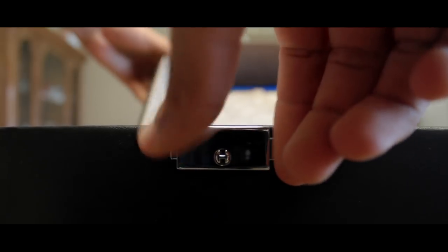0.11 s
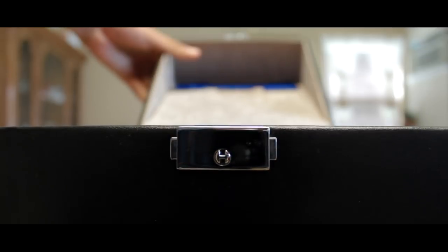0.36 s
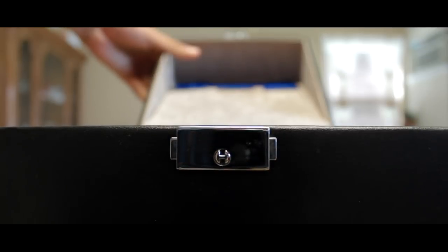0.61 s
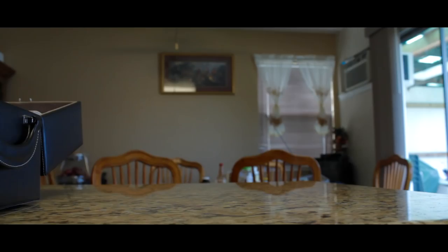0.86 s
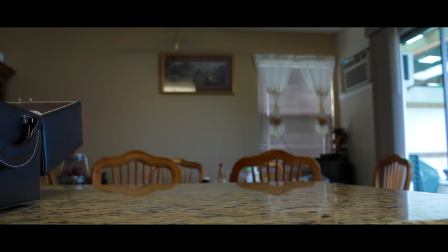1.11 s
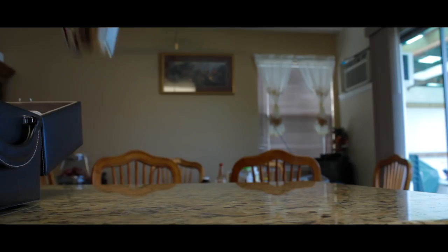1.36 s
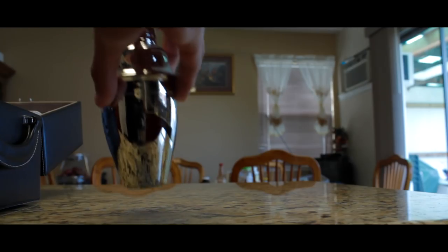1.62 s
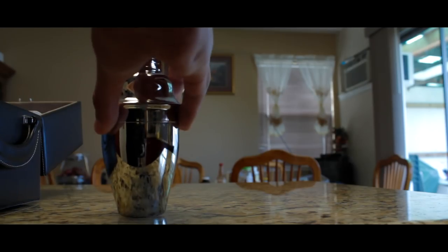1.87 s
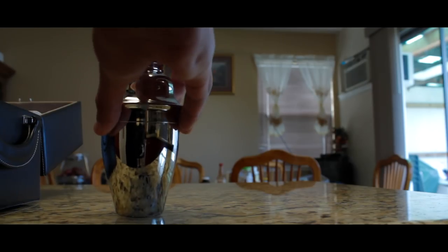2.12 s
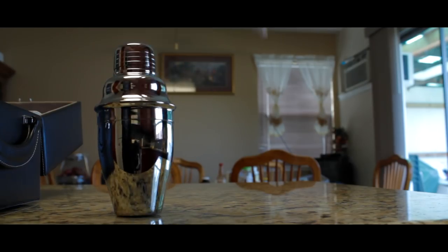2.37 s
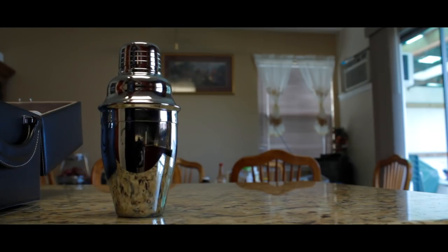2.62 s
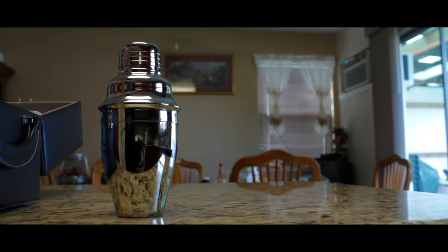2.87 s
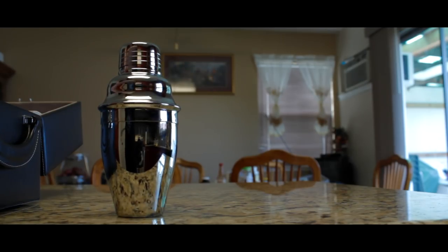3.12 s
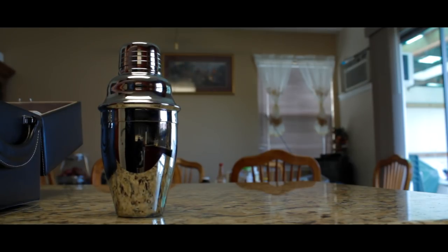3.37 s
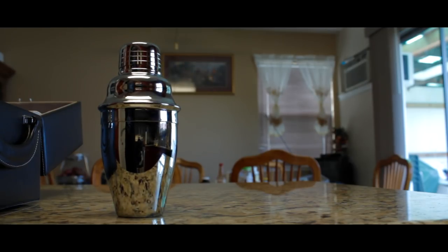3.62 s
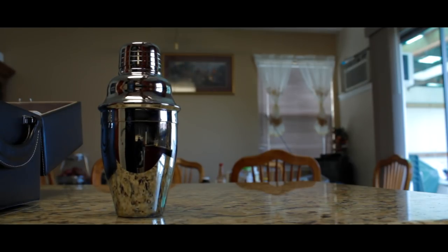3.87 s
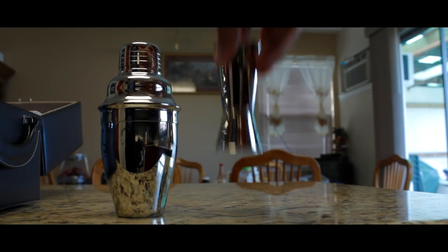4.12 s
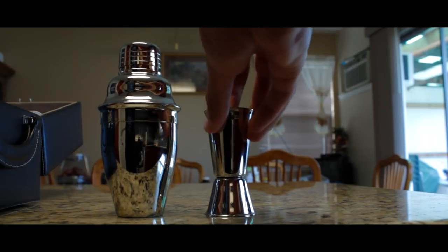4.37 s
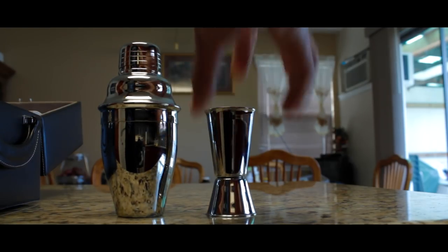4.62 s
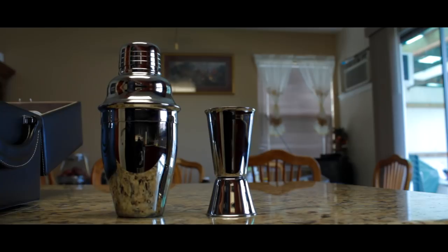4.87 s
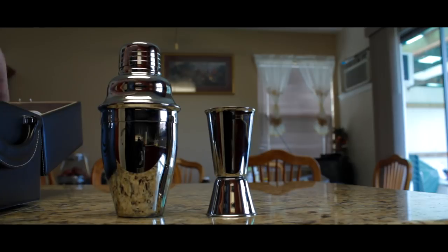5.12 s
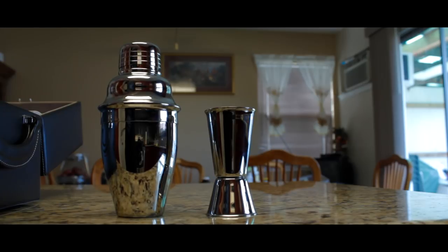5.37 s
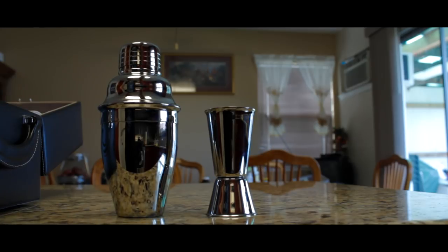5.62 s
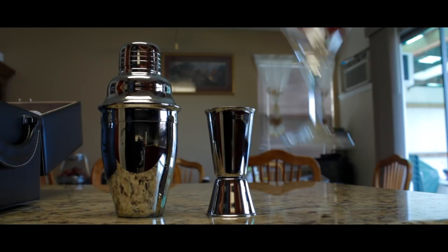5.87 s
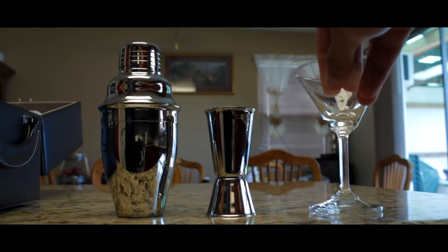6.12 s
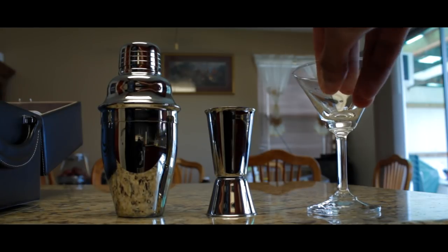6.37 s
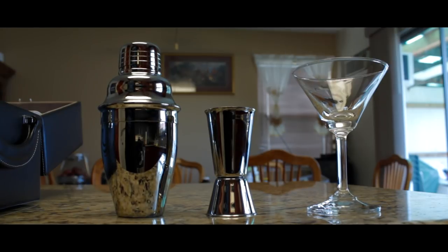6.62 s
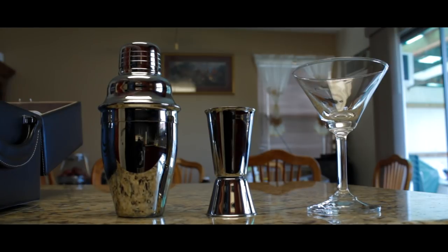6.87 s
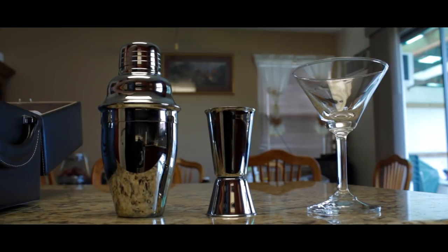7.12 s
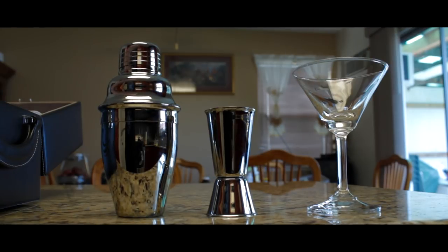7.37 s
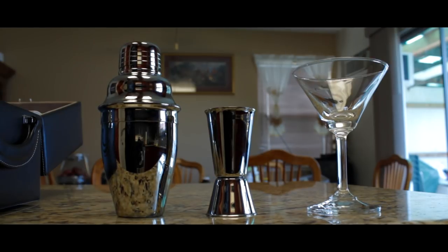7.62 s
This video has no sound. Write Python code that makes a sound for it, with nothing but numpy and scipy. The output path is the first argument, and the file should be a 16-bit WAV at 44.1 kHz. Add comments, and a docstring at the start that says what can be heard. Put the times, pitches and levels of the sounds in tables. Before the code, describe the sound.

A quiet kitchen with soft, wide appliance rumble and faint microphone hiss throughout; the hiss drops slightly near 0.9 s and the rumble swells gently around 2.8 s. Between 0.14 and 0.27 s a case latch gives several small, dry clicks. At 1.96 s a metal shaker hits the stone counter with a loud, hard clack and a very fast cap rattle. Its tin taps at 2.43 s, with fainter touches until 2.76 s. Tiny spoon ticks from 3.17 s lead to a sharp jigger-and-tool clatter at 3.39 s, then a loud case lid knock at left around 3.47-3.52 s. At 4.47 s the jigger lands with a bright, rapid chatter. A small dry spoon knock comes at 5.28 s. At 6.20 s a stemmed glass clinks down crisply, followed by faint glass and spoon touches until 6.55 s. Impacts are close, centred, short-ringing and slightly clipped, with brief room echoes; room tone remains.

```python
"""In a kitchen a case latch clicks; then a metal shaker with a rattling cap and its tin land on a stone counter.
A spoon, a jigger and loose tools follow, the case lid knocks at the left, and the jigger chatters on its rim.
A spoon drops with a drier knock; last a stemmed glass is set down and the spoon touches again.
Each blow sums hand-damped modes and a contact crack, and noise echoes answer; a close centre microphone clips.
Throughout, a wider pair hears the room tone: appliance rumble and microphone hiss, made of coloured noise."""
import sys
import numpy as np
from scipy import signal
from scipy.fft import rfft, irfft
from scipy.io import wavfile
from scipy.ndimage import uniform_filter1d

SR = 44100
rng = np.random.default_rng(int(sys.argv[2]) if len(sys.argv) > 2 else 0)


def amplitude_ratio(level_db):
    """Convert a level in decibels to the matching linear amplitude (field) ratio."""
    exponent = np.asarray(level_db, float) / 20
    return 10 ** exponent


def generate_wav(sig):
    """Save sig (samples, or channels by samples) to the path in sys.argv[1] as 16-bit PCM at SR."""
    pcm = np.round(np.clip(np.atleast_2d(sig).T, -1, 1) * 32767).astype(np.int16)
    wavfile.write(sys.argv[1], SR, pcm)


N = 341334

# damped modes of each object: mode_hz, relative_level_db, t60_s
SHAKER_MODES = [(166.6, -22, 0.35), (376, -16, 0.056), (520, -13, 0.017), (754, -3, 0.032),
                (980, -9.5, 0.019), (1430, -4, 0.033), (1606, -1, 0.014), (1930, -5, 0.0094),
                (2260, -5, 0.024), (2550, -22, 0.052), (3784, -6, 0.086), (3970, -18, 0.061),
                (5160, -21, 0.09), (5570, -20, 0.027), (6560, -39, .02), (7670, -14.5, 0.057),
                (8370, -13.5, 0.017), (10500, -37, 0.02), (10900, -30, 0.027), (13000, -15, 0.057),
                (12700, -13, 0.021), (14100, -31.5, .05), (14000, -30, .02), (15170, -28, 0.031)]
TIN_MODES = [(300, -14, 0.067), (540, -1, 0.046), (700, -2, 0.078), (834, -0.5, 0.048), (980, 0, 0.02),
             (1404, 4, 0.036), (1560, 7, 0.022), (1880, 3.5, 0.027), (2273, 1.5, 0.051), (2650, -9.5, 0.01),
             (3900, -3.5, 0.081), (5000, -23, 0.12), (6000, -17, 0.024), (7340, -16.5, 0.017),
             (8300, -21, 0.024), (10200, -40, .02), (11880, -21, 0.038), (13200, -27, .02)]
JIGGER_MODES = [(4663, -1, 0.057), (6100, -11.5, 0.026), (6370, -5, 0.025), (7260, -11, 0.016),
                (8780, -7.5, 0.049), (9640, -28, 0.077), (11200, -17, 0.092), (12300, -24, 0.078),
                (13845, -25, 0.12), (15080, -9, 0.066), (15200, -27, 0.081)]
JIGGER_FOOT_MODES = [(357, -14.5, 0.036), (492, -10, 0.077), (690, -4, 0.013), (900, -5, 0.047),
                     (1150, -2, 0.011), (1414, 2.5, 0.066), (1530, 1, 0.028), (1805, 5, 0.016),
                     (2200, -1, 0.045), (2780, 0, 0.01), (3400, 2.5, 0.0081), (4100, -2.5, 0.013)]
TOOL_MODES = [(895, -3, 0.096), (1390, 4, 0.017), (1730, 6, 0.024), (2140, -8, 0.051), (2580, -3, 0.017),
              (3000, -6.5, 0.12), (3355, 2.5, .025), (3800, -12, 0.49), (4370, -5, 0.062),
              (5500, -18, 0.081), (7100, -6.5, 0.18)]
SPOON_MODES = [(1620, -2, 0.027), (3034, -4, 0.055), (3758, 0.5, 0.062), (4500, -4, 0.021),
               (5570, -3, 0.022), (7440, -9, 0.043), (9500, -6.5, .03), (12200, -10, .02),
               (15000, -24, .01)]
GLASS_MODES = [(277, -14, 0.05), (372, -15, 0.21), (570, -14, 0.0277), (793, -5, 0.046), (1260, -12, 0.011),
               (1453, 1.5, 0.034), (1690, 9, 0.013), (2200, -19, 0.036), (2940, -7.5, 0.031),
               (3700, -11, 0.009), (4230, 8.5, 0.01), (4900, 2, 0.0078), (5570, -8.5, 0.034),
               (6060, -16, 0.024), (7360, -2, 0.042), (8600, -45, .02), (10770, -7, .02),
               (11320, -8.5, 0.077), (13200, -31, .04), (12840, -25, .02), (13900, 0.5, 0.043),
               (16000, -43, .01)]
LATCH_MODES = [(700, -4.5, 0.0074), (1170, -6, 0.016), (2200, -0.5, 0.0077), (3300, 0, 0.0057),
               (5900, 16, 0.0029), (13800, -50, 0.0073)]
LID_MODES = [(318, -12, 0.021), (523, -9, 0.027), (653.6, -8.5, 0.11), (1114, -0.5, 0.011),
             (1640, -1.5, 0.0086), (2030, -7, 0.03), (2260, -6.5, 0.0085), (2970, 1.5, 0.016),
             (3690, 3, 0.0094), (5570, -1, 0.0044), (6440, -4.5, 0.011), (8100, 0.5, 0.0023),
             (9730, -11, 0.013), (12900, -18.5, 0.013), (15000, -19, .004)]

# blows on each object: start_s, level_db, favoured_hz, fall_off_db_per_octave, room_share_db
SHAKER_BLOWS = [(1.956, -12.5, 2000, 3, -6)]
TIN_BLOWS = [(2.425, -29.5, 2000, 0.3, -6), (2.43, -32, 1000, 10, -10), (2.582, -45, 2260, 0.5, 0.5),
             (2.6845, -36.5, 890, 7, -4), (2.757, -48, 810, 18, -6)]
JIGGER_BLOWS = [(3.32, -64, 4680, 4, 8), (3.346, -60.5, 8780, 8.5, 15), (3.388, -28, 8000, 1.6, -0.8)]
TOOL_BLOWS = [(3.3883, -24.5, 2000, 2.6, -7.5), (3.415, -39, 1850, 11, -2), (3.424, -33, 2500, 17, 5)]
SPOON_BLOWS = [(3.167, -53, 4600, 13, -10), (3.184, -47, 2390, 9, 0), (3.227, -62, 3400, 16, -7),
               (3.245, -53.5, 4740, 11, 0), (3.252, -49.5, 2200, 10, 3.5), (6.471, -57.5, 5570, 40, 6.5),
               (6.518, -52.5, 4300, 13.5, 6)]
SPOON_DROP_BLOWS = [(5.2813, -46.5, 3200, 2.7, -4), (5.286, -50.5, 3600, 2.6, -8)]
GLASS_BLOWS = [(6.2001, -25.5, 2000, 1.13, -8.5), (6.209, -28.5, 3400, 11, -29), (6.271, -38, 2780, 9.2, 4),
               (6.542, -61, 6000, 0.3, -20), (6.548, -43.5, 1440, 6.9, -3)]
LATCH_BLOWS = [(.139, -35, 900, 13.3, -12), (.212, -37.5, 2000, 1.1, -14), (.237, -33, 800, 10.5, -9),
               (.241, -40.5, 2460, 8.9, -9), (.266, -32, 700, 12, -26)]
LID_BLOWS = [(3.4724, -20.5, 3700, 2.6, 6), (3.4775, -20, 9100, 11, -17), (3.487, -21, 616, 4.2, -9.5),
             (3.519, -29, 12500, 11, 0)]

# faint tings as fingers leave the rims: start_s, pitch_hz, level_db, t60_s
RIM_TINGS = [(2.334, 2610, -63, 0.22), (2.337, 4620, -66, 0.11), (2.337, 9000, -66, .06),
             (4.65, 13150, -64, .15), (4.655, 9900, -68, .1)]
# reverberation by octave: centre_hz, t60_s, relative_level_db
ROOM_BANDS = [(131, 0.2, -13), (264, 0.56, 10), (466, 0.35, 9), (1000, 0.5, 7), (2000, 0.44, 1),
              (3900, 0.45, -1), (8000, 0.4, -1), (15400, 0.16, 3.5)]
# width of the lid's echoes: frequency_hz, side_minus_mid_db
LID_WIDTH = [(200, -10), (1000, -8), (4400, -7), (8000, -0.5), (15000, -7)]
# spectral density of the room tone: frequency_hz, relative_level_db
TONE_COLOUR = [(8.2, -41), (14, -4.5), (95, 3.5), (124, -2), (148, 0), (230, -6), (274, -2), (337, -7),
               (557, -10.5), (626, -13.5), (704, -14), (1700, -22), (8370, -33), (14600, -34), (16000, -37)]
# width of the room tone: frequency_hz, side_minus_mid_db
TONE_WIDTH = [(60, -3.5), (110, -7.5), (200, -6), (380, -8), (700, -8), (1290, -9), (2380, -9.5),
              (4400, -7.5), (8120, -7.5), (15000, -7.5)]

# bouncing after a landing: first_contact_s, first_gap_s, gap_ratio
CAP_TIMING = 1.968, .0085, .78
JIGGER_TIMING = 4.4664, .0053, 1
# bouncing contacts: first_level_db, drop_db_per_bounce, favoured_hz, fall_off_db_per_octave, room_share_db
CAP_RATTLE = -26.5, 0, 12000, 17, -11
RIM_CHATTER = -22.5, 3.5, 5000, 2.8, -8.5
FOOT_CHATTER = -26, 3, 1500, 1.5, -6

# crack of a plain blow over its modes (dB); the objects below add their own offsets (dB)
CRACK_DB = 27.5
SHAKER_CRACK_DB, CAP_CRACK_DB, TIN_CRACK_DB, JIGGER_CRACK_DB, RIM_CRACK_DB, FOOT_CRACK_DB = 2.5, -6, -2, -5, -4.5, -17
TOOL_CRACK_DB, SPOON_CRACK_DB, DROP_CRACK_DB, GLASS_CRACK_DB, LATCH_CRACK_DB, LID_CRACK_DB = -9, -8.5, 0, 7.5, -16, -7.5
SOFT_DB = 0.8  # crack lost per dB/octave of fall-off: glancing touches crack less
SLAB_DB = 3.5  # the stone slab spreads the crack into the room more than the ringing
CLIP = .222  # amplitude at which the centre microphone's input clips

# the rumble swells once and wanders; the hiss steps down early on
RUMBLE_DB, SWELL_DB, SWELL_S, SWELL_WIDTH_S, WANDER_DB = -60.5, 2, 2.8, 2.07, 1.07
HISS_DB, EARLY_HISS_DB, HISS_STEP_S = -72, -70.5, .86


def counter():
    """Superposition and saturation: blows, tings and echoes add up at the centre microphone, whose input clips."""
    cap_blows = bounces(CAP_TIMING, CAP_RATTLE, count=4)
    rim_blows = bounces(JIGGER_TIMING, RIM_CHATTER, count=4)
    foot_blows = bounces(JIGGER_TIMING, FOOT_CHATTER, count=3)
    sets = [
        (SHAKER_MODES, SHAKER_BLOWS, SHAKER_CRACK_DB),
        (SHAKER_MODES, cap_blows, CAP_CRACK_DB),
        (TIN_MODES, TIN_BLOWS, TIN_CRACK_DB),
        (JIGGER_MODES, JIGGER_BLOWS, JIGGER_CRACK_DB),
        (JIGGER_MODES, rim_blows, RIM_CRACK_DB),
        (JIGGER_FOOT_MODES, foot_blows, FOOT_CRACK_DB),
        (TOOL_MODES, TOOL_BLOWS, TOOL_CRACK_DB),
        (SPOON_MODES, SPOON_BLOWS, SPOON_CRACK_DB),
        (SPOON_MODES, SPOON_DROP_BLOWS, DROP_CRACK_DB),
        (GLASS_MODES, GLASS_BLOWS, GLASS_CRACK_DB),
        (LATCH_MODES, LATCH_BLOWS, LATCH_CRACK_DB),
    ]
    direct, send = sum(strike(*one) for one in sets)
    return np.clip(direct + tings() + room(send, gap_s=0.0022), -CLIP, CLIP)


def strike(modes, blows, crack_db):
    """Modal excitation: each blow rings damped modes and a contact crack; returns direct sound and room feed."""
    hz, db, t60 = np.transpose(modes)
    t = np.arange(SR // 2) / SR
    decay = np.exp(-np.log(1000) * t / t60[:, None])
    # signs alternate from mode to mode, so the spectrum between neighbours stays filled and the onset soft
    sign = (-1) ** np.arange(len(hz))[:, None]
    shapes = sign * decay * np.sin(2 * np.pi * hz[:, None] * t)
    out = np.zeros((2, N + len(t)))
    for start_s, blow_db, spot_hz, fall_db, room_db in blows:
        # the spot that is hit favours some modes, and no two blows land alike
        octaves = np.abs(np.log2(hz / spot_hz))
        mode_db = db - max(fall_db, 0) * octaves + rng.standard_normal(len(hz))
        ringing = amplitude_ratio(mode_db) @ shapes
        sound = np.array([ringing, amplitude_ratio(room_db) * ringing])
        # the many fast-dying modes in between merge into a click of the same broad colour
        broad_db = uniform_filter1d(mode_db, size=3)
        low_end = (hz[0] / 2, broad_db[0] - 4)
        high_end = (hz[-1] * 2, broad_db[-1] - 13)
        crack = click([low_end, *zip(hz, broad_db), high_end])
        path_db = np.array([[0], [room_db + SLAB_DB]])
        sound[:, :len(crack)] -= amplitude_ratio(CRACK_DB + crack_db - SOFT_DB * fall_db + path_db) * crack
        i = int(start_s * SR)
        out[:, i:i + len(t)] += amplitude_ratio(blow_db) * sound
    return out[:, :N]


def click(table):
    """Minimum phase: folding the cepstrum gives a causal click with the colour of (Hz, dB) points."""
    hz, db = np.transpose(table)
    size = 1024
    f = np.arange(size // 2 + 1) * SR / size + 1
    cepstrum = irfft(np.log(amplitude_ratio(np.interp(np.log(f), np.log(hz), db))))
    cepstrum[1:size // 2] *= 2
    cepstrum[size // 2 + 1:] = 0
    return irfft(np.exp(rfft(cepstrum)))


def bounces(timing, contact, count):
    """Repeated impact: gaps keep a fixed ratio and levels fall by a fixed drop, which may be zero."""
    start_s, gap_s, ratio = timing
    db, drop_db, *spot = contact
    blows = []
    for k in range(count):
        elapsed_s = gap_s * sum(ratio ** j for j in range(k))
        blows.append((start_s + elapsed_s, db - k * drop_db, *spot))
    return blows


def tings():
    """Free vibration: single faint partials, each decaying exponentially."""
    t = np.arange(SR // 4) / SR
    out = np.zeros(N)
    for start_s, hz, db, t60 in RIM_TINGS:
        decay = np.exp(-np.log(1000) * t / t60)
        out[int(start_s * SR):][:len(t)] += amplitude_ratio(db) * decay * np.sin(2 * np.pi * hz * t)
    return out


def lid():
    """Stereo by level difference: the lid's direct sound is mostly left, its diffuse echoes partly shared."""
    direct, send = strike(LID_MODES, LID_BLOWS, LID_CRACK_DB)
    mid = room(send, gap_s=0.00047)
    side = colour(room(send, gap_s=0.0024), LID_WIDTH)
    left = amplitude_ratio(4) * direct + amplitude_ratio(-2.5) * (mid + side)
    right = amplitude_ratio(-17) * direct + amplitude_ratio(-1.85) * (mid - side)
    return np.array([left, right])


def room(x, gap_s):
    """Diffuse reverberation: noise echoes build up after a gap and die octave by octave."""
    t = np.arange(int(.8 * SR)) / SR
    f = np.maximum(np.arange(len(t) // 2 + 1) * SR / len(t), 1)
    noise = rfft(rng.standard_normal(len(t)))
    tail = 0
    for hz, t60, db in ROOM_BANDS:
        window = np.cos(np.pi / 2 * np.clip(np.log2(f / hz), -1, 1)) ** 2
        band = irfft(noise * window, len(t))
        tail = tail + amplitude_ratio(db) * band * np.exp(-np.log(1000) * t / t60)
    build_up = 1 - np.exp(-np.maximum(t - gap_s, 0) / 0.00083)
    tail = tail * build_up
    unit_tail = tail / np.sqrt(np.sum(tail ** 2))
    return signal.fftconvolve(x, unit_tail)[:N]


def room_tone():
    """Stationary noise under slow gains: swelling appliance rumble and microphone hiss, widest in the bass."""
    mid = colour(rng.standard_normal(N), TONE_COLOUR)
    side = colour(colour(rng.standard_normal(N), TONE_COLOUR), TONE_WIDTH)
    t = np.arange(N) / SR
    rumble, hiss = split(np.array([mid + side, mid - side]), 500)
    # the levels refer to these bands of the mid signal
    rumble_ref = signal.sosfilt(signal.butter(4, [30, 400], "band", fs=SR, output="sos"), mid)
    hiss_ref = signal.sosfilt(signal.butter(4, [3000, 15000], "band", fs=SR, output="sos"), mid)
    wander = np.interp(t, np.arange(32) / 4, rng.standard_normal(32))
    swell = np.exp(-((t - SWELL_S) / SWELL_WIDTH_S) ** 2)
    rumble_db = RUMBLE_DB + SWELL_DB * swell + WANDER_DB * wander
    hiss_db = np.where(t < HISS_STEP_S, EARLY_HISS_DB, HISS_DB)
    return rumble / np.std(rumble_ref) * amplitude_ratio(rumble_db) + hiss / np.std(hiss_ref) * amplitude_ratio(hiss_db)


def colour(x, table):
    """Spectral weighting: a signal is shaped by (Hz, dB) points on a logarithmic frequency axis."""
    hz, db = np.transpose(table)
    f = np.maximum(np.arange(len(x) // 2 + 1) * SR / len(x), 1)
    return irfft(rfft(x) * amplitude_ratio(np.interp(np.log(f), np.log(hz), db)), len(x))


def split(x, hz):
    """Complementary crossover: a zero-phase low band and the remainder above it."""
    low = signal.sosfiltfilt(signal.butter(2, hz, fs=SR, output="sos"), x)
    return low, x - low


def scene():
    """Linear superposition of the centre blows, the left knock and the room tone."""
    return counter() + lid() + room_tone()


def top_cut(x):
    """Nothing passes above the cut-off."""
    return signal.sosfilt(signal.butter(12, 16830, fs=SR, output="sos"), x)


def record(dry):
    """Band limiting: a steep elliptic low-pass cuts the top above 16.3 kHz."""
    low_pass = signal.ellip(8, .2, 70, 16300, fs=SR, output="sos")
    mix = signal.sosfilt(low_pass, dry)
    return top_cut(mix)


dry = scene()
out = record(dry)
generate_wav(out)
```